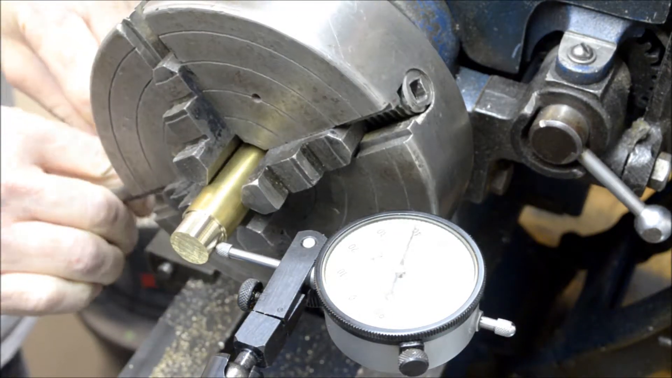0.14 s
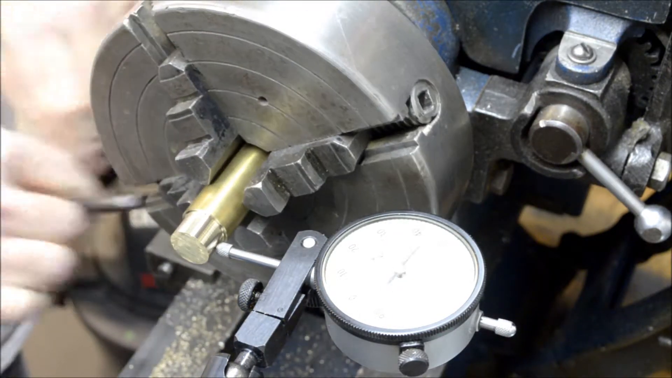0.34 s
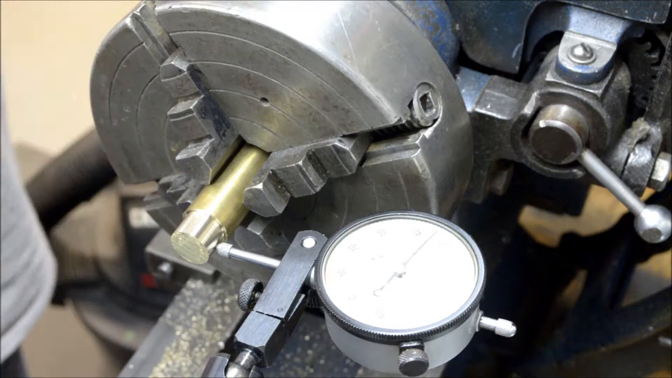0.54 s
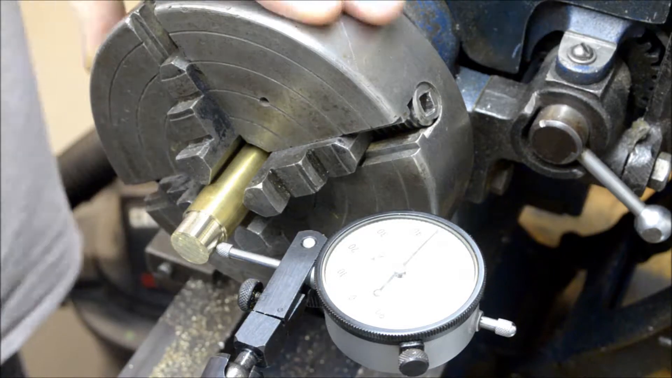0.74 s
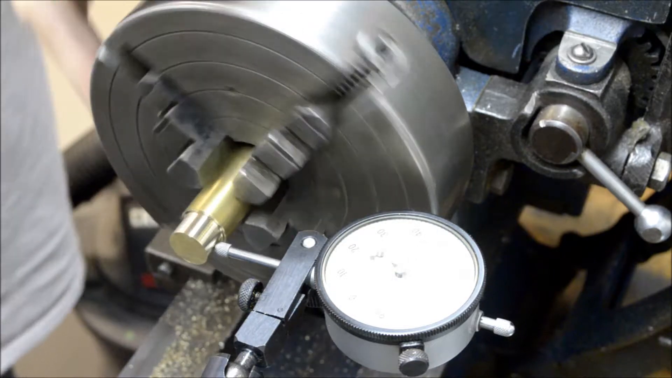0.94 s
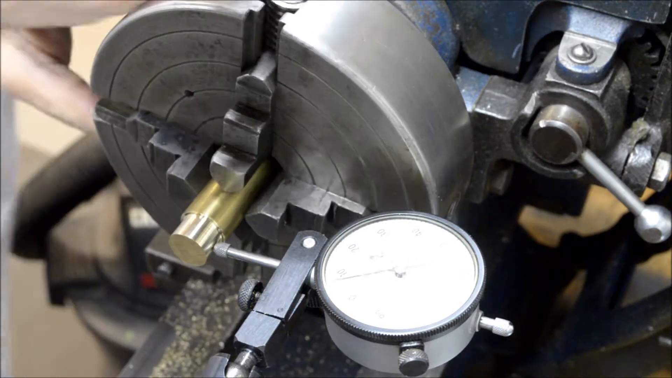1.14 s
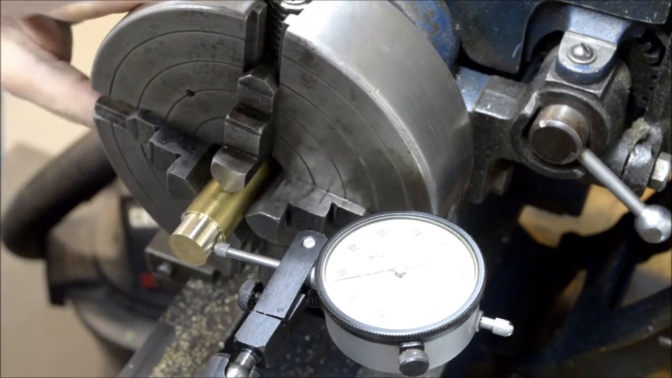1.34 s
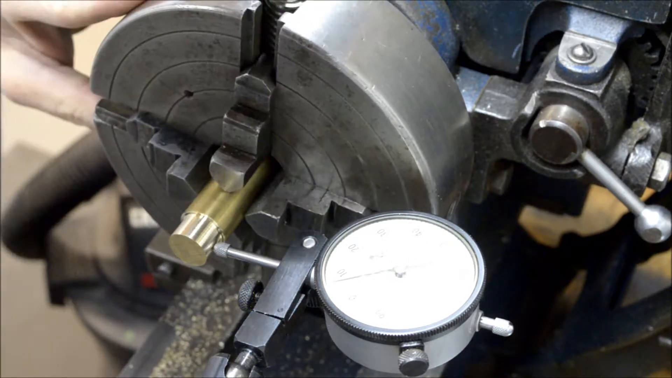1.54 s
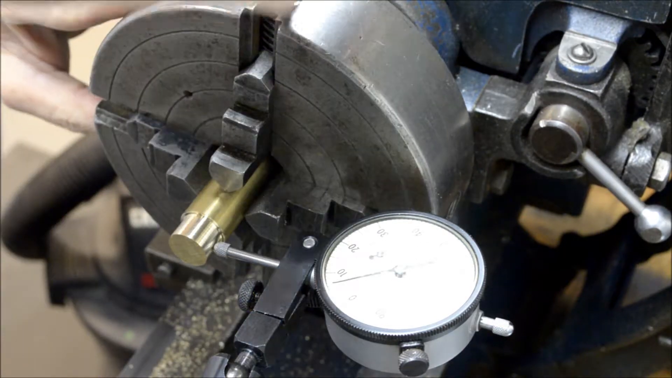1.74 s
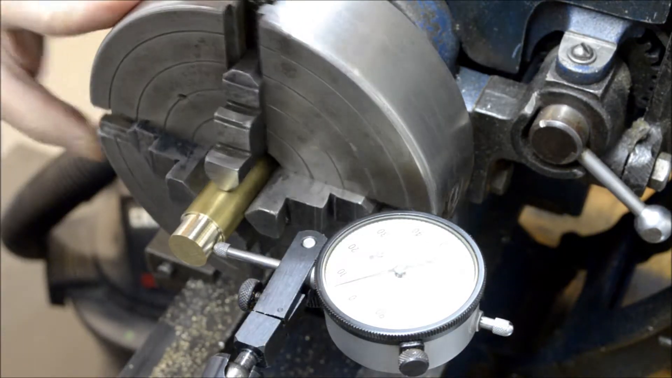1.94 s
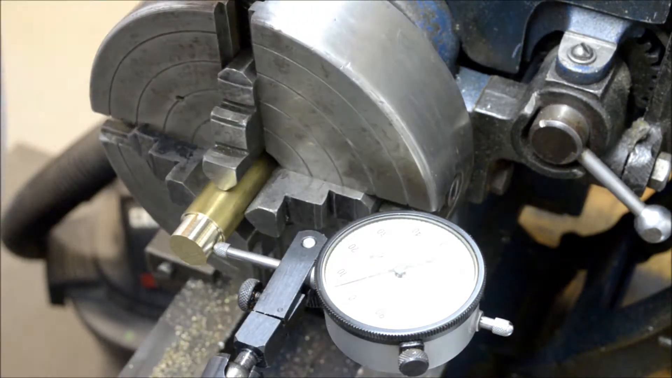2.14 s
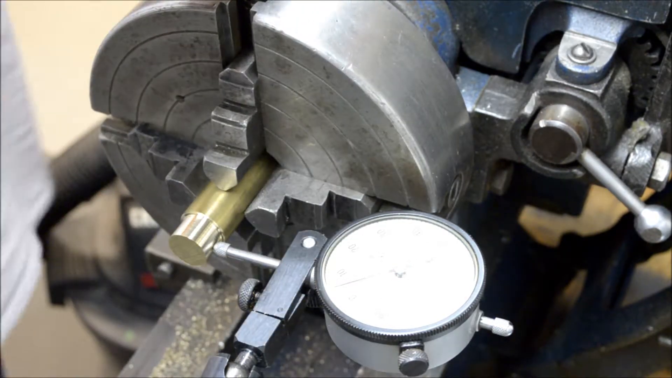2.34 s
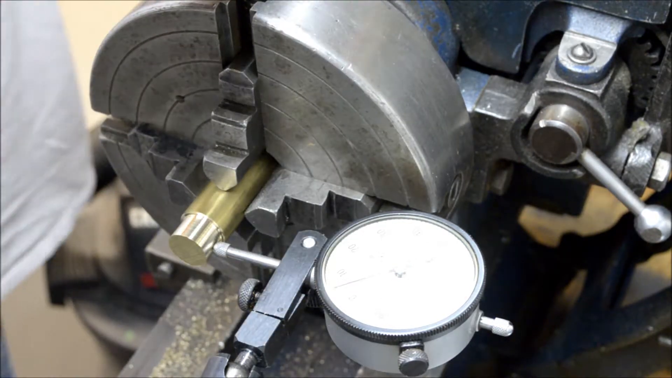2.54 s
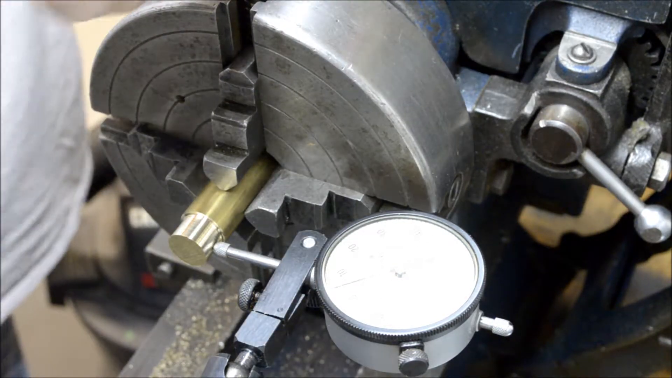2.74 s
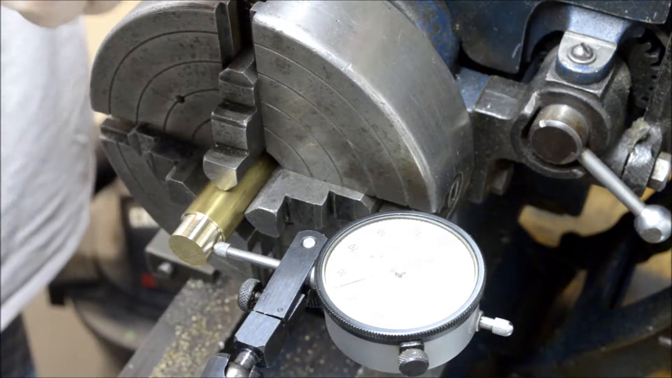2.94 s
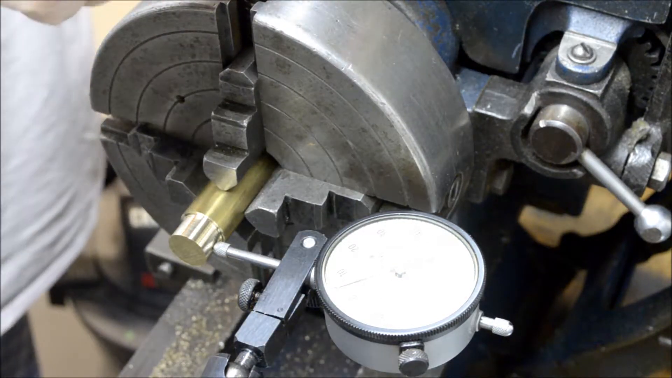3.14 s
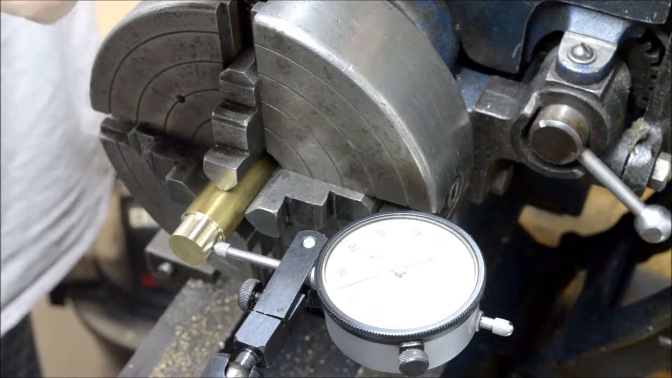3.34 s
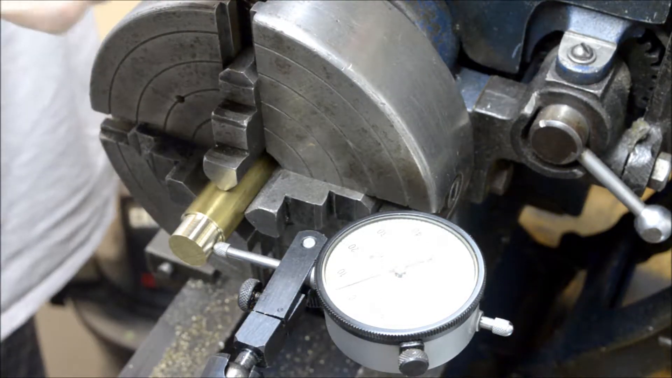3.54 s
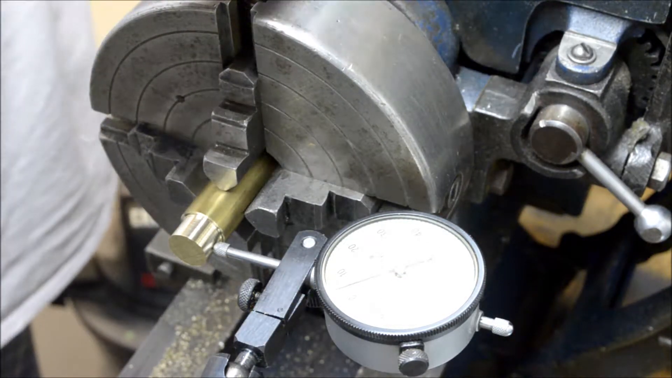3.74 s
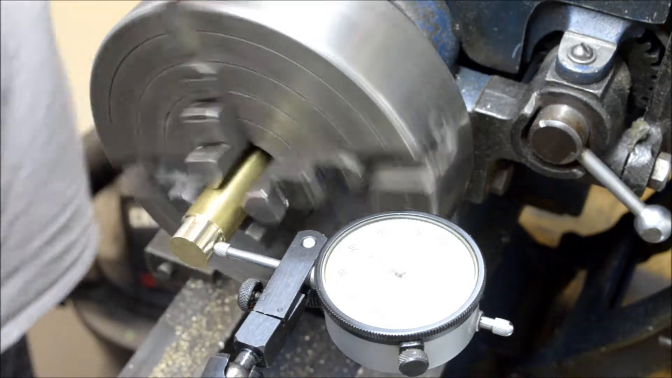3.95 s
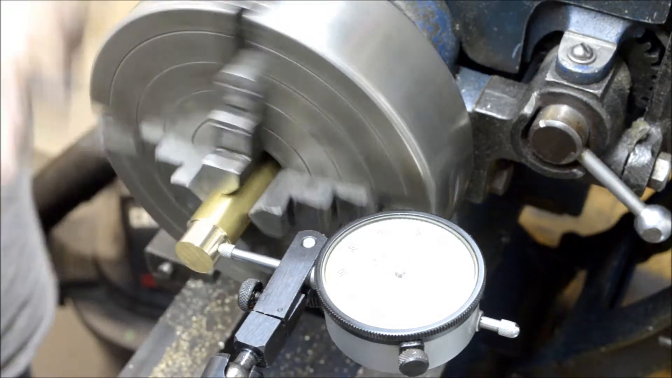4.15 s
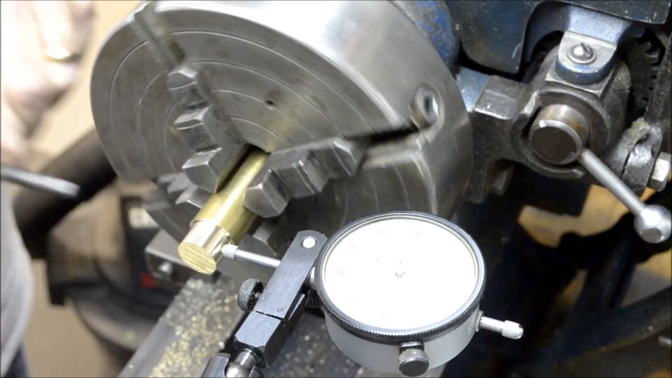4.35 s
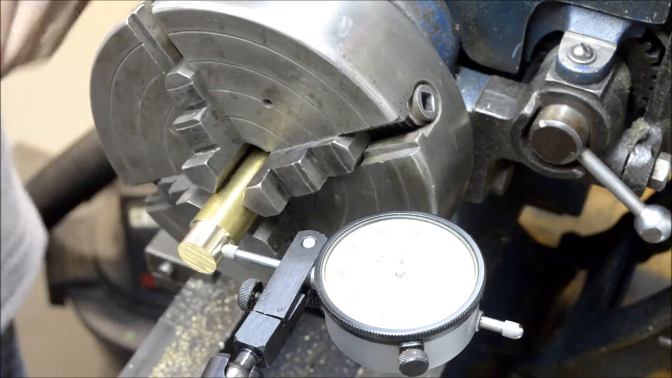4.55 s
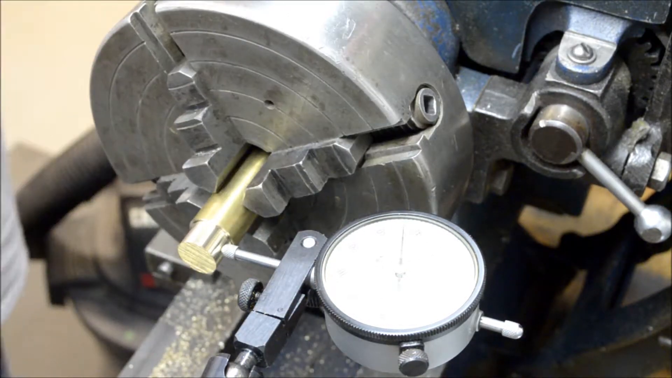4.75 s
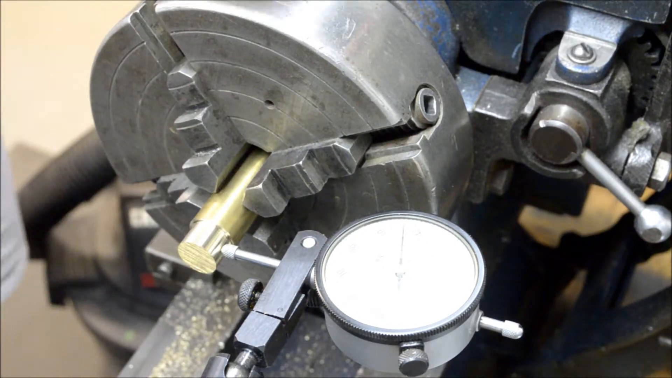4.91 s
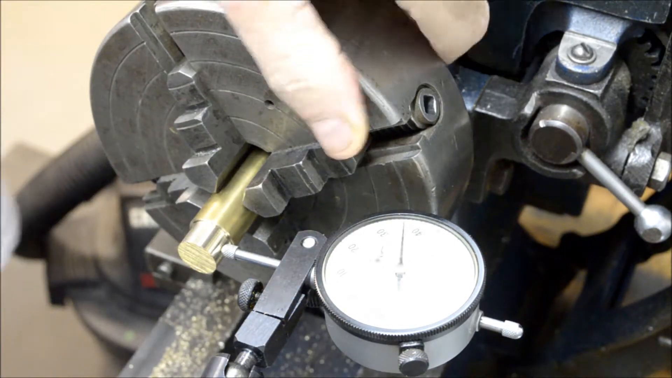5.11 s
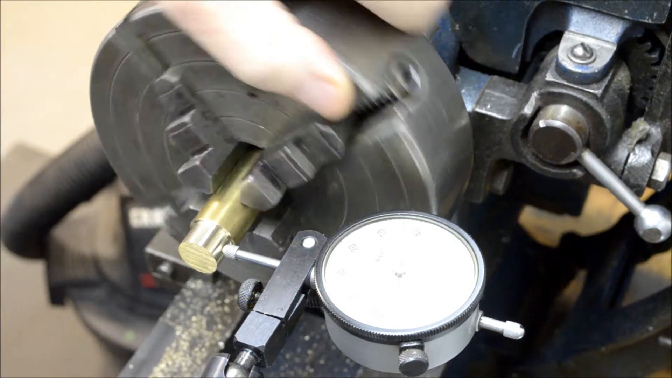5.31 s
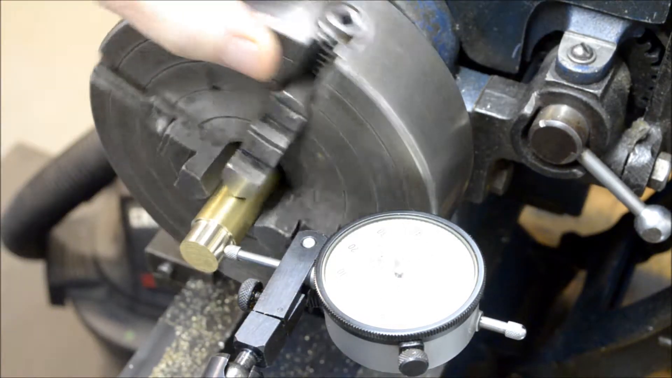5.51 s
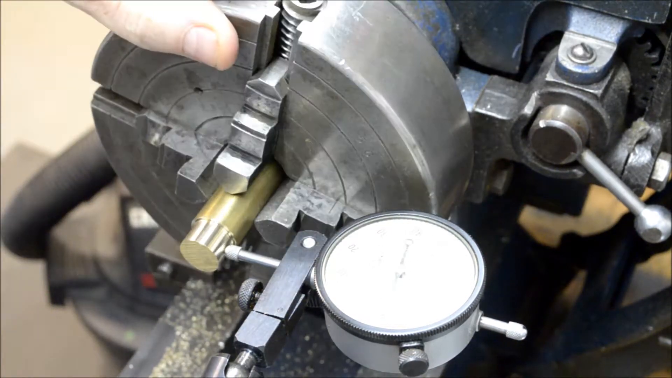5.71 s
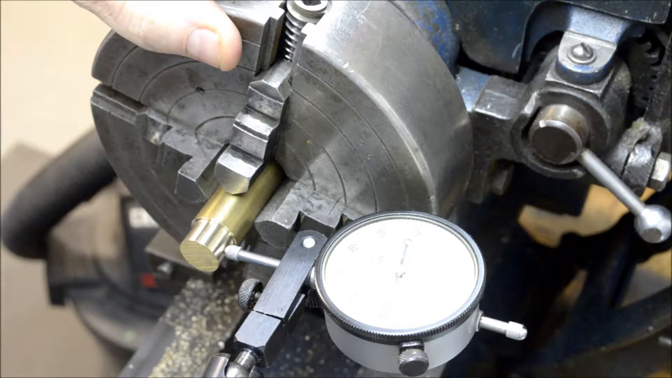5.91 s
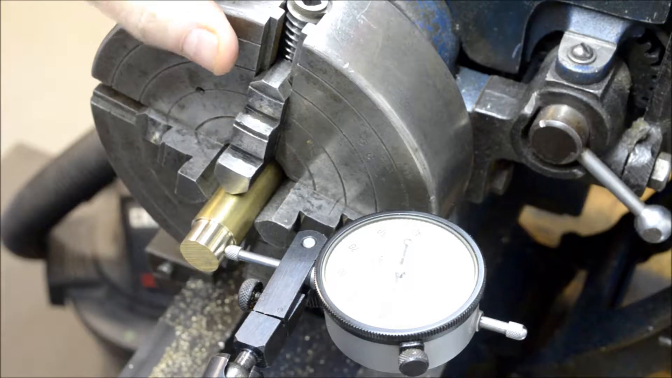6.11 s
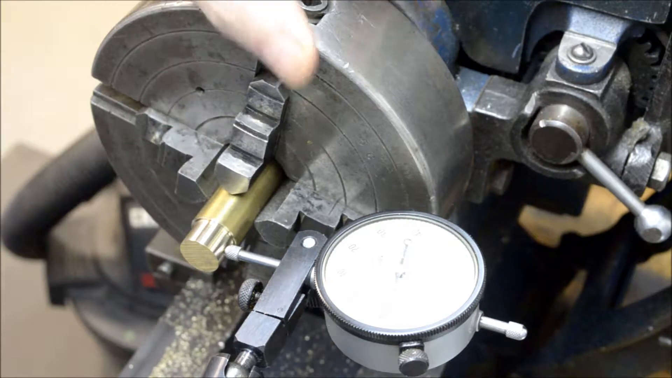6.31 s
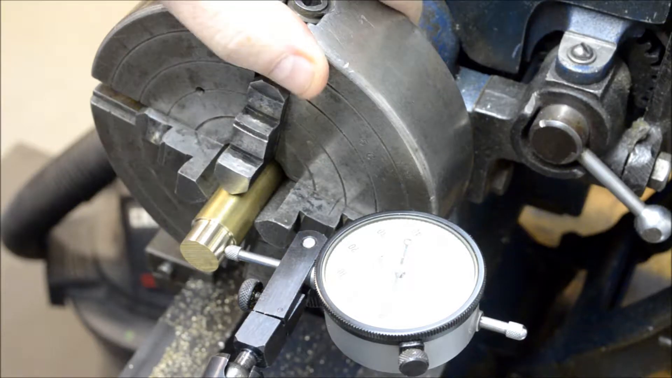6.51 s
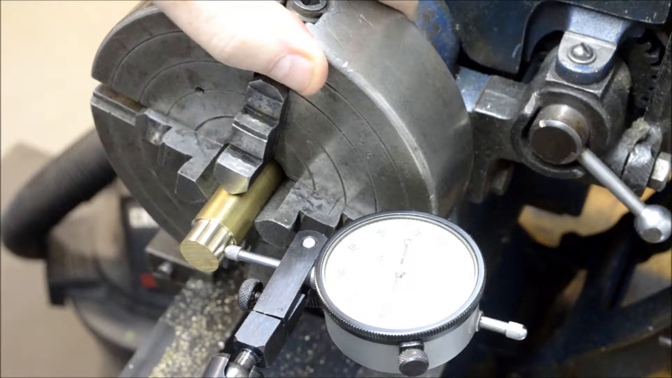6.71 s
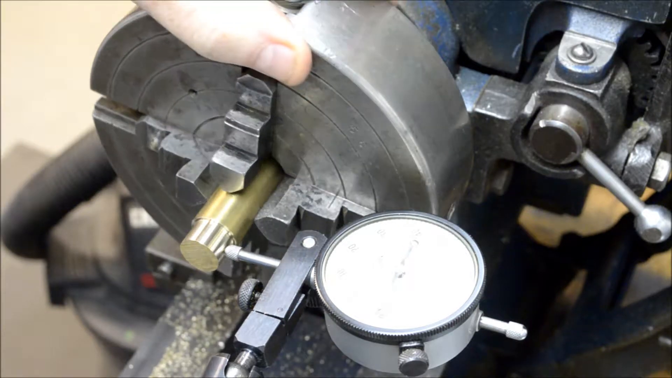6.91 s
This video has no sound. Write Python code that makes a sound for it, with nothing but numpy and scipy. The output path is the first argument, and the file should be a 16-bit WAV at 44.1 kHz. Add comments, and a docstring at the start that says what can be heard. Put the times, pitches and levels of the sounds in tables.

```python
"""A quiet workshop, microphone close to a four-jaw lathe chuck being snugged on a brass bar.
Over a low rumble and a faint whine, hand and sleeve rustle among light clicks and a brief squeak.
The hand turns the chuck: the spindle's play is taken up with a dull knock, then it drags as a dry rasp.
At 1.7 s the key snaps home, ringing the steel, and a short turn follows. After a lull come three more
turns, with clicks and rustles between them and one sharp click near 4.1 s."""
import sys
import numpy as np
from scipy import signal
from scipy.fft import rfft, irfft
from scipy.io import wavfile
from scipy.ndimage import uniform_filter1d

SR = 44100
rng = np.random.default_rng(int(sys.argv[2]) if len(sys.argv) > 2 else 0)


def wav_record(signal):
    """Record a signal, one row per channel, as 16-bit PCM in the file named by sys.argv[1]."""
    frames = np.transpose(np.atleast_2d(signal))
    bounded = np.clip(frames, -1, 1)
    # unit amplitude maps onto the largest positive 16-bit level
    quanta = np.round(bounded * 32767).astype(np.int16)
    wavfile.write(sys.argv[1], SR, quanta)


N = 307377
TIME, HIT_TIME = np.arange(N) / SR, np.arange(SR // 2) / SR

# Levels are relative within each table; the functions set the balance at the microphone.
# turns by hand: t/s, length/s, braking/s, level/dB, easing/(dB/s), grumble offset/dB, treble offset/dB
HAND_TURNS = [(0.864, 0.39, 0.099, -42.5, 0.5, -11.5, -2.5), (1.808, 0.29, 0.032, -47, 14.5, -8, -5.5),
              (3.849, .62, 0.14, -42.5, -5.5, -12, -3.5), (5.293, .44, 0.14, -43, -4.5, -13, -3.5),
              (6.784, 0.2, 0.048, -47.5, 17, -11, -2.5)]
# tight spots where the drag binds, slack ones where it runs free: t/s, lift/dB
TIGHT_SPOTS = [(0.91, 5), (0.972, -1), (1.025, 5), (1.07, -1.5), (1.161, 3.5), (1.9, 6.5), (3.948, 4.5),
               (3.975, -4), (4.0, 3.5), (4.03, 2.5), (4.118, 4.5), (4.212, 3.5), (4.242, -5), (4.33, 3),
               (5.42, 3), (5.455, -4), (5.52, 0), (5.585, 1.5)]
# colour of the rasp: f/Hz, level/dB
RASP_COLOUR = [(120, -42.5), (280, -7.5), (450, -15), (900, -9.5), (1500, -6), (2500, 2), (4000, 1.5),
               (5200, -1), (6500, -0.5), (8300, -1.5), (10000, -6.5), (12000, -15.5), (14000, -25.5),
               (16000, -35)]
# headstock resonances: f/Hz, width/Hz, lift/dB
HEADSTOCK = [(347, 40, 0.5), (573.4, 100, 11), (761.5, 45, 8.5), (1194, 70, 6), (1350, 76, 5),
             (1762, 110, 4.5), (2230, 79, 4), (2710, 50, 3.5), (4055, 110, 3.5), (5040, 60, 5),
             (5380, 50, 3.5), (6330, 120, 4), (6860, 46, 3.5), (7200, 140, 3.5), (7700, 50, 4),
             (8330, 120, 5.5)]
# key and spindle knock on the chuck:
# t/s, level/dB, tilt/(dB/octave), top edge/Hz, clatter t60/s, ring offset/dB, struck spot's pitch/Hz
CHUCK_KNOCKS = [(0.861, -42, 1, 2190, 0.064, -13, 760), (1.3997, -37, -3.5, 9100, 0.081, 0, 2670),
                (1.6799, -20, 2, 15000, 0.076, 1, 1080), (1.841, -43.5, -5.5, 5000, 0.22, -10, 1510),
                (3.6908, -43.5, -2, 5950, 0.083, -6, 2240), (3.6981, -40.5, -3, 8300, 0.059, -3, 3100),
                (5.288, -45.5, -3, 2000, 0.13, -15, 1236)]
# ringing modes of chuck and key: f/Hz, level/dB, t60/s
STEEL_MODES = [(340.7, -4.5, 0.125), (392, -7, 0.058), (737, -14, 0.13), (1095, -8.5, 0.049),
               (1400, -23.5, 0.16), (1550, -15, .09), (2190, -17.5, 0.094), (2410, -14, 0.12),
               (2581, -7, 0.11), (2660, -13.5, .08), (3040, -19, .12), (3490, -19.5, .12),
               (4210, -13.5, 0.099), (4670, -18, 0.092), (5060, -15.5, 0.074), (6616, -9.5, .1),
               (7044, -5, .08), (7144, -12, 0.14), (7418, -9.5, 0.087), (7720, -16.5, .11),
               (8200, -11, .11), (9454, -20, .08), (11450, -17.5, .08), (14350, -23, .07)]
# colour of the clatter between key and socket: f/Hz, level/dB
CLATTER_COLOUR = [(120, -40.5), (230, -22.5), (320, -2), (550, -9.5), (1000, -4.5), (1900, -6),
                  (2600, -3.5), (4000, -3), (5500, -4.5), (7000, 5.5), (8500, -1), (10000, -10.5),
                  (12000, -18.5), (16000, -27.5)]
# light clicks at the chuck and, at 1.673 s, a faint noisy lead-in just before the key's snap:
# t/s, level/dB, low edge/Hz, high edge/Hz, t60/s
SHORT_BURSTS = [(0.152, -53, 1100, 2500, 0.086), (0.1728, -37.5, 766, 9600, 0.076),
                (0.2537, -57, 5000, 6960, 0.03), (.2745, -45.5, 1400, 4000, 0.035),
                (0.296, -50, 970, 1580, 0.055), (.409, -59, 6000, 8260, 0.073),
                (0.824, -48, 930, 2900, 0.14), (0.857, -42.5, 1500, 7260, 0.18),
                (1.204, -39.5, 2540, 7400, 0.049), (1.348, -60.5, 1200, 8160, 0.061),
                (1.577, -51.5, 2680, 7200, 0.15), (1.630, -55.5, 895, 1900, 0.12),
                (1.673, -39, 900, 8020, 0.072), (1.8202, -37, 2190, 4730, 0.047),
                (1.914, -36.5, 5500, 9300, 0.067), (2.0936, -39.5, 2700, 4350, 0.075),
                (3.334, -64, 1600, 7000, 0.061), (3.445, -62.5, 1605, 7050, 0.076),
                (3.815, -58.5, 2200, 6600, 0.13), (4.138, -24, 3450, 9200, 0.077),
                (4.979, -46.5, 975, 4220, 0.2), (5.064, -53.5, 980, 2520, 0.08),
                (5.281, -40.5, 1080, 3900, 0.12), (5.619, -34.5, 2300, 4600, 0.043),
                (5.7263, -38.5, 2300, 5650, 0.076), (6.759, -57, 2480, 9000, 0.28),
                (6.77, -48.5, 1110, 2240, 0.099)]
# grit cracking in the drag: t/s, level/dB
GRIT_CRACKS = [(0.8857, -32.5), (3.855, -49), (4.2598, -44), (5.332, -37.5), (5.3992, -35.5),
               (5.688, -39.5), (6.7896, -43), (6.8895, -37.5), (6.9172, -36)]
# stick-slip squeaks of steel: t/s, f/Hz, level/dB, length/s
STEEL_SQUEAKS = [(0.238, 7780, -54, 0.053), (0.846, 734, -47.5, 0.057), (1.628, 734, -54.5, 0.051),
                 (1.779, 1170, -55, .02), (3.88, 4090, -43, 0.083)]
# hand or sleeve rubs: peak t/s, rise/s, fade/s, level/dB, scuff offset/dB
HAND_RUBS = [(0.27, 0.029, 0.034, -73, 15.5), (0.37, 0.046, 0.087, -66, -3.5), (0.52, .1, .2, -75.5, -2),
             (0.79, 0.071, 0.08, -73, 0), (1.56, 0.26, 0.069, -72, 0.5), (2.32, 0.074, 0.083, -73, 7.5),
             (4.559, 0.047, 0.023, -59.5, 0.5), (4.62, 0.045, 0.028, -58, -2),
             (4.775, 0.042, 0.024, -64, 4.5), (4.8, 0.19, 0.12, -77.5, 7.5), (5.19, 0.25, 0.15, -72.5, 1),
             (6.42, 0.14, .12, -82.5, 17)]
# colours of click, rustle, scuff and workshop air: f/Hz, level/dB
CLICK_COLOUR = [(100, -11.5), (300, 2), (9000, 1.5), (16000, -16)]
RUSTLE_COLOUR = [(2000, -24.5), (5000, -1), (8500, 1.5), (11000, -9.5), (16000, -38)]
SCUFF_COLOUR = [(200, -13), (1000, -4), (2400, -1), (4200, -9.5), (7000, -49.5)]
AIR_COLOUR = [(20, -31), (42, -16.5), (60, -7.5), (82, 4), (105, -14.5), (170, -20), (280, -16), (550, -22),
              (1600, -26.5), (3000, -31), (5000, -36), (8500, -41), (12000, -48), (16000, -57)]
# faint whine in the shop: f/Hz, level/dB
WHINE_TONES = [(418, -86.5), (1680, -82.5), (2040, -84)]
# narrow dips of the microphone port: f/Hz, width/Hz, gain/dB
MIC_PORT_DIPS = [(5710, 260, -9.5), (6967, 99, -12), (15020, 250, -18.5)]


def turning_chuck(grumble_db=-2, rasp_db=-1, treble_db=-1, judder_db=0.47, wander_db=2.2, bands=7):
    """The chuck drags: dense slips sound through the headstock, changing colour as the contact moves."""
    hz = freqs(TIME)
    friction = slips(per_s=9000, spread_db=2) * undb(judder_db * walk(110))
    body = rfft(friction) * colour(hz, RASP_COLOUR) * bumps(hz, HEADSTOCK)
    low, bright = below(hz, 1480) ** 2, below(6460, hz) ** 2
    registers = zip((low, 1 - low - bright, bright), (grumble_db, rasp_db, treble_db), drag_gains())
    drag = sum(unit(irfft(body * share, N)) * undb(db) * gain for share, db, gain in registers)
    # overlapping half-octave bands each wander in level
    spectrum, band = rfft(drag), np.clip(2 * np.log2(hz / 1000), 0, bands - 1)
    shares = (np.maximum(1 - abs(band - k), 0) for k in range(bands))
    return sum(irfft(spectrum * share, N) * undb(wander_db * walk(45)) for share in shares)


def drag_gains(spin_up_s=0.024, speed_powers=(0.63, 1.49, 1.87), bind_s=0.013, treble_share=0.35):
    """Grumble, rasp and treble follow each turn's speed and tight spots; a slow chuck mostly grumbles."""
    gains = np.zeros((3, N))
    for s, length_s, brake_s, db, easing, low_db, high_db in HAND_TURNS:
        age = np.clip(TIME - s, 0, length_s)
        speed = np.clip(np.minimum(age / spin_up_s, (length_s - age) / brake_s), 0, 1)
        for gain, power, offset_db in zip(gains, speed_powers, (low_db, 0, high_db)):
            gain += speed ** power * undb(db + offset_db - easing * age)
    lift_db = sum(db * swell(s, bind_s, bind_s) for s, db in TIGHT_SPOTS)
    return gains * undb([lift_db, lift_db, treble_share * lift_db])


def knocks(ring_db=-4, build_cycles=3.3, spot_db=7.5, spot_width=0.16):
    """Steel clatters on steel and rings the chuck; each struck spot favours one pitch."""
    out, hz = np.zeros(N), freqs(HIT_TIME)
    mode_hz, mode_db, mode_t60 = np.transpose(STEEL_MODES)[:, :, None]
    # each mode needs a few cycles to build up, so the lows come late
    envelope = (1 - np.exp(-HIT_TIME * mode_hz / build_cycles)) * decay(mode_t60)
    socket = colour(hz, CLATTER_COLOUR)
    for s, db, tilt_db, edge_hz, t60, offset_db, spot_hz in CHUCK_KNOCKS:
        contact = undb(tilt_db * np.log2(np.maximum(hz, 500) / 4000)) * below(hz, edge_hz, order=5)
        contact *= bumps(hz, [(spot_hz, spot_width * spot_hz, spot_db)])
        contact *= rms(socket) / rms(socket * contact)
        swing = np.sin(2 * np.pi * mode_hz * HIT_TIME) * rng.choice([-1, 1], mode_hz.shape)
        modes = undb(mode_db) * np.interp(mode_hz, hz, contact) * swing * envelope
        ring = undb(ring_db + offset_db) * modes.sum(axis=0)
        clatter = chatter(t60, socket * contact, crack_db=-10.5)
        add(out, s, undb(db) * (clatter + ring))
    return out


def clicks(trim_db=1, rise_cycles=2.2, grit_band_hz=(2570, 9100), grit_t60=0.048):
    """Clicks, grit and the snap's noisy lead-in: short resonant bursts; lower ones start more slowly."""
    out, hz = np.zeros(N), freqs(HIT_TIME)
    body = bumps(hz, HEADSTOCK) * colour(hz, CLICK_COLOUR)
    grit = [(s, db, *grit_band_hz, grit_t60) for s, db in GRIT_CRACKS]
    for s, db, low_hz, high_hz, t60 in SHORT_BURSTS + grit:
        band = below(low_hz, hz, order=4) * below(hz, high_hz)
        burst = chatter(t60, body * band, crack_db=-17.5, rise_s=rise_cycles / low_hz)
        add(out, s, undb(db + trim_db) * burst)
    return out


def chatter(t60, gain, crack_db, crack_t60=0.014, grain=0.42, rise_s=1e-5):
    """A first crack, then a dying burst of grainy noise, as of steel bouncing on steel."""
    sign, size = rng.standard_normal((2, len(HIT_TIME)))
    grains = unit(sign * np.exp(grain * size))
    fade = decay(t60) + undb(crack_db) * decay(crack_t60)
    attack = 1 - np.exp(-HIT_TIME / rise_s)
    return causal(grains * fade * attack, gain / rms(gain))


def squeaks(waver=0.055):
    """Slipping steel locks briefly onto one resonance: an unsteady tone that swells and fades."""
    out = np.zeros(N)
    for s, hz, db, length_s in STEEL_SQUEAKS:
        arch = np.sin(np.pi * np.minimum(HIT_TIME / length_s, 1))
        pitch = hz * (1 + waver * walk(900, size=len(HIT_TIME)))
        add(out, s, undb(db) * arch * tone(pitch))
    return out


def hand_and_sleeve(trim_db=-1):
    """Skin and cloth slide: a fine bright rustle, and a duller scuff where the hand presses."""
    hz = freqs(TIME)
    friction = rfft(slips(per_s=3000, spread_db=-0.5) * undb(1.3 * walk(110)))
    rustle = unit(irfft(friction * colour(hz, RUSTLE_COLOUR), N))
    scuff = unit(irfft(friction * colour(hz, SCUFF_COLOUR), N))
    return sum(swell(s, rise_s, fade_s) * undb(db + trim_db) * (rustle + undb(scuff_db) * scuff)
               for s, rise_s, fade_s, db, scuff_db in HAND_RUBS)


def workshop(direct, wet_db=-13, low_t60=0.3, high_t60=0.14, gap_s=0.005):
    """A small cluttered room from close up: direct sound, then a short tail whose treble dies first."""
    scatter = rfft(rng.standard_normal(len(HIT_TIME)))
    low = below(freqs(HIT_TIME), 3000, order=1) ** 2
    tail = irfft(scatter * low) * decay(low_t60) + irfft(scatter * (1 - low)) * decay(high_t60)
    tail *= HIT_TIME > gap_s
    return direct + undb(wet_db) * signal.fftconvolve(direct, tail / np.linalg.norm(tail))[:N]


def room_tone(air_db=-62, rumble_edge_hz=120, throb_db=1.5, waver_hz=4):
    """The shop behind the chuck: soft air, a low rumble that throbs and a faint wavering whine."""
    hz = freqs(TIME)
    air = unit(irfft(rfft(rng.standard_normal(N)) * colour(hz, AIR_COLOUR), N))
    air *= undb(air_db + 0.6 * walk(2.8))
    rumble = irfft(rfft(air) * below(hz, rumble_edge_hz), N)
    whine = sum(undb(db) * np.sqrt(2) * tone(f + waver_hz * walk(25)) for f, db in WHINE_TONES)
    return air - rumble + rumble * undb(throb_db * walk(15)) + whine


def slips(per_s, spread_db):
    """Tiny slips of rough surfaces, at random instants and of uneven size."""
    happens = rng.random(N) < per_s / SR
    size = undb(spread_db * np.minimum(rng.exponential(size=N), 5))
    return unit(happens * size * rng.choice([-1, 1], N))


def walk(rate_hz, size=N):
    """Smooth random wander of rms 1."""
    hold = max(int(SR / rate_hz), 1)
    steps = np.repeat(rng.standard_normal(size // hold + 1), hold)
    return unit(uniform_filter1d(steps, hold)[:size])


def swell(s, rise_s, fade_s):
    """A smooth rise to 1 at time s, then a smooth fall."""
    return np.exp(-((TIME - s) / np.where(TIME < s, rise_s, fade_s)) ** 2)


def decay(t60):
    """A fall of 60 dB in t60 seconds."""
    return np.exp(-np.log(1000) * HIT_TIME / t60)


def tone(hz):
    """A sine that follows a moving pitch."""
    return np.sin(2 * np.pi * np.cumsum(hz) / SR)


def freqs(x):
    """Frequency of each spectrum bin of x, at least 1 Hz."""
    return np.maximum(np.fft.rfftfreq(len(x), 1 / SR), 1)


def colour(hz, points):
    """Gain of an outline of f/Hz, level/dB."""
    at, db = np.transpose(points)
    return undb(np.interp(np.log(hz), np.log(at), db))


def bumps(hz, rows):
    """Gain of a set of resonances or dips."""
    return undb(sum(db / (1 + (2 * (hz - f) / width) ** 2) for f, width, db in rows))


def below(hz, edge_hz, order=3):
    """Gain of a low-pass; with the arguments swapped, a high-pass."""
    return 1 / np.sqrt(1 + (hz / edge_hz) ** (2 * order))


def causal(x, gain):
    """Minimum-phase filter with this gain, so that attacks stay sharp."""
    cepstrum = irfft(np.log(gain + 1e-5), len(x))
    cepstrum[1:len(x) // 2] *= 2
    cepstrum[len(x) // 2 + 1:] = 0
    return irfft(rfft(x) * np.exp(rfft(cepstrum)), len(x))


def undb(db):
    """Decibels to gain."""
    return 10 ** (np.asarray(db) / 20)


def rms(x):
    """Root mean square, kept above zero."""
    return np.sqrt(np.mean(x ** 2) + 1e-20)


def unit(x):
    """Scale to rms 1."""
    return x / rms(x)


def add(out, s, x):
    """Mix x in at time s."""
    start = int(s * SR)
    out[start:start + len(x)] += x[:N - start]


def scene():
    """The work at the chuck, close by in the workshop, over the room tone."""
    at_chuck = turning_chuck() + hand_and_sleeve() + knocks() + clicks() + squeaks()
    return (workshop(at_chuck) + room_tone())[None]


def record(dry):
    """One microphone: its port cuts narrow dips, and the recorder cuts the top."""
    at_mic = causal(dry[0], bumps(freqs(TIME), MIC_PORT_DIPS))
    top_cut = signal.ellip(10, 0.2, 70, 15650, fs=SR, output="sos")
    return signal.sosfilt(top_cut, at_mic)[None]


dry = scene()
out = record(dry)
wav_record(out)
```